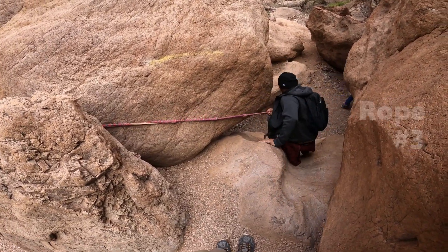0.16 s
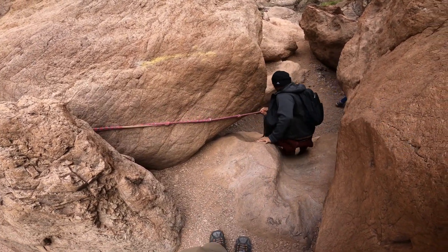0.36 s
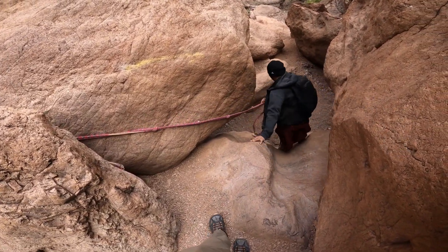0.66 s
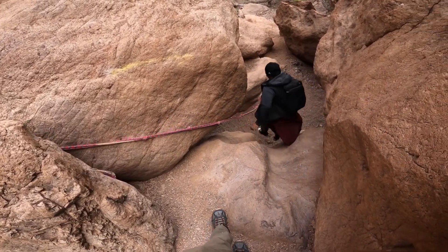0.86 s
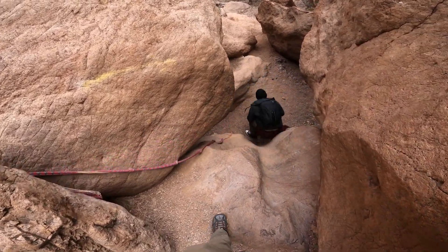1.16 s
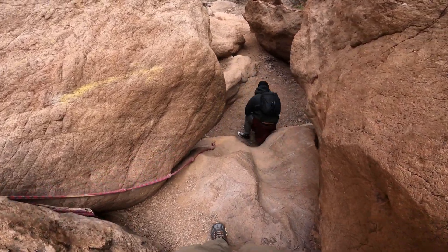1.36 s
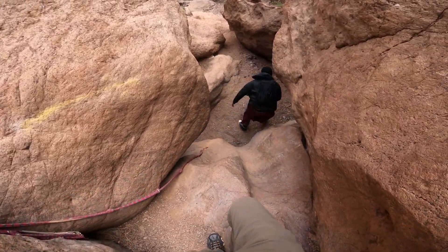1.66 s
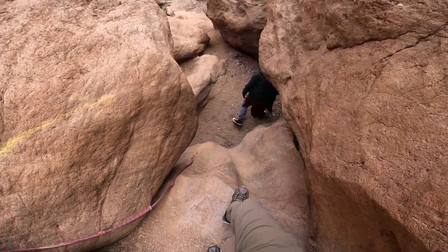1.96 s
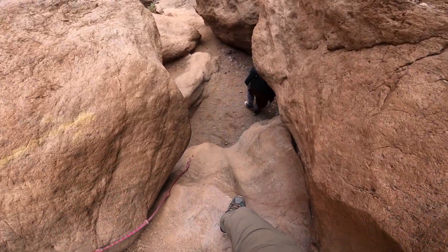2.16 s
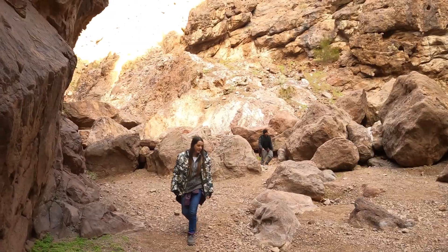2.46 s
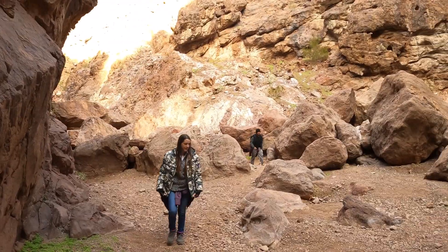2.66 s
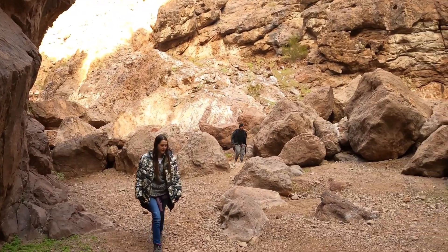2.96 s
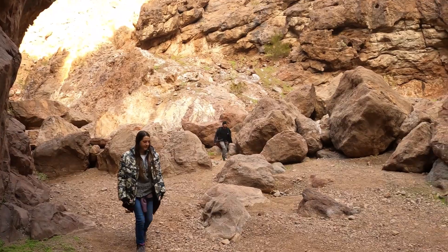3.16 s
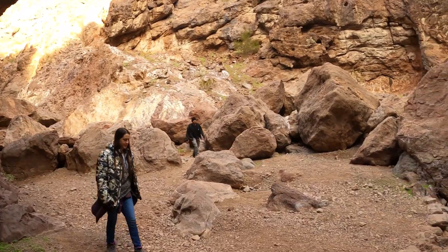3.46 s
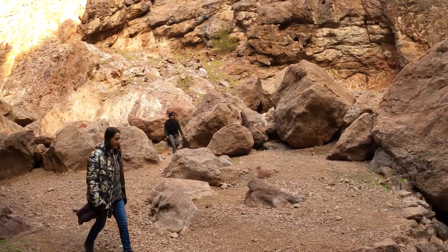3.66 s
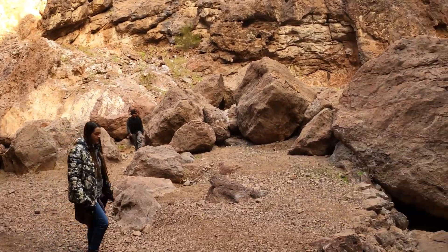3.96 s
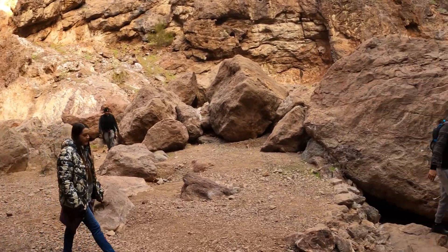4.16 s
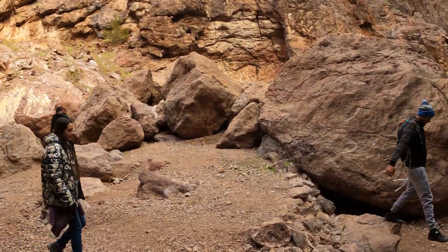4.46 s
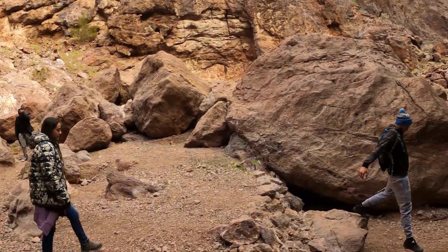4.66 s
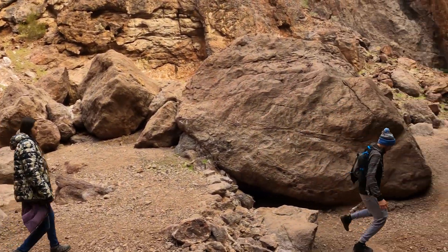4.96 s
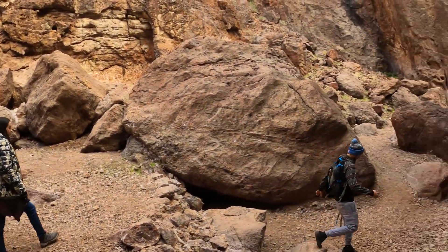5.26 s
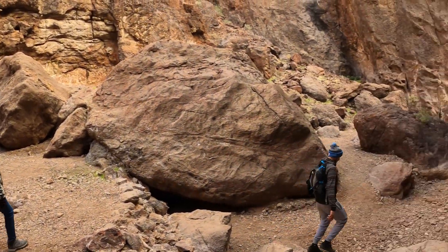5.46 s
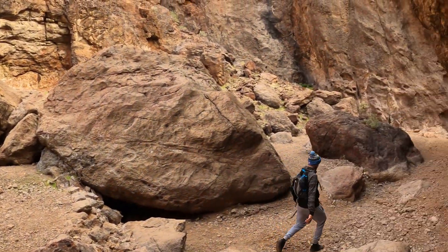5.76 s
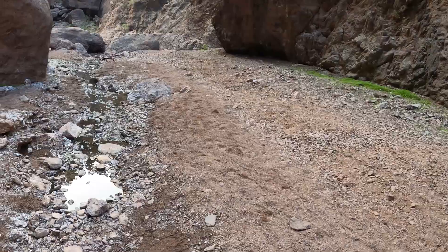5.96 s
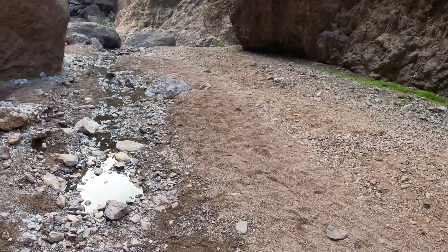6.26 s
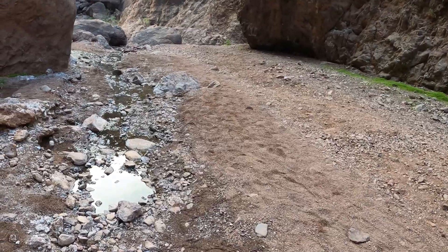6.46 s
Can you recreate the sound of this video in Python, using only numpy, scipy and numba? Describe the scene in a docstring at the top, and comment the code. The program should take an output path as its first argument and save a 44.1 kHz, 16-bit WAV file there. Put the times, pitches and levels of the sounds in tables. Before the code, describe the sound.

Hikers scuff through a rocky slot with jacket rustle and a heavy drop onto grit, then crunch across gravel and a sandy path.

```python
"""Footsteps of hikers in a dry canyon: each footfall thuds, shifts pebbles and crushes grit.
In a narrow slot a jacket rustles, zip pulls tinkle and someone drops off a rock ledge onto grit.
After a short silence walkers cross an open gravel wash, heel then sole, and go on along a sandy path.
The ground is made of countless tiny ticks and rings; single stones and hollow knocks are decaying tones.
The rock walls answer faintly, as fading noise, over a quiet hush of air."""
import sys
import numpy as np
from scipy import signal
from scipy.fft import rfft, irfft, next_fast_len
from scipy.io import wavfile
from scipy.ndimage import uniform_filter1d
from numba import njit

SR = 44100
rng = np.random.default_rng(int(sys.argv[2]) if len(sys.argv) > 2 else 0)


def materialize(psi):
    """Save the field psi as 16-bit PCM at rate SR to the path in sys.argv[1].

    A 1-D psi becomes a single channel; in a 2-D psi each row is a channel.
    """
    bounded = np.clip(np.atleast_2d(psi).T, -1, 1)
    quanta = np.round(bounded * 32767).astype(np.int16)
    wavfile.write(sys.argv[1], SR, quanta)


N = 291942
TIME = np.arange(N) / SR
SLOT_END_S, WASH_END_S = 2.4, 6.01

# All levels below are set before the gain of each place (PLACE_GAIN) and the final filters.
# Heel, sole and scuff contacts. Each row: time in seconds, rise in seconds, press in seconds,
# level in dB, weight on the foot in dB, grittiness in dB.
FOOTFALLS = [(0.23, 0.0016, 0.012, -45, 15, -10), (.43, .005, 0.024, -50.5, 8, 7),
             (0.783, 0.0063, 0.023, -54, -4, 15.5), (0.873, 0.0056, 0.0079, -49, -1, 7),
             (1.102, 0.009, 0.031, -28, 16.5, -4), (1.191, 0.0071, 0.057, -44, 22.5, 1.5),
             (1.268, 0.0066, 0.067, -36, 0, -40), (1.403, .003, 0.0048, -47.5, 20.5, 0),
             (1.447, .005, 0.048, -39.5, 2, -8), (1.64, 0.0069, 0.026, -42.5, 14.5, 0),
             (1.734, 0.002, 0.038, -37.5, 21, -11), (1.846, 0.0022, 0.024, -33.5, 10.5, -0.5),
             (2.095, .002, 0.0079, -39.5, 12.5, -36), (2.178, 0.015, 0.12, -44.5, 4, -18),
             (2.49, 0.0091, .025, -49.5, -8, -2), (2.563, 0.0081, 0.048, -52, 2.5, -10),
             (2.75, 0.0045, .048, -41, 2, -26), (3.008, 0.022, 0.08, -46.5, -2, 7),
             (3.097, 0.0027, 0.011, -37, -11, 8), (3.137, 0.0027, 0.042, -47, -8, 11.5),
             (3.264, .002, 0.0095, -42.5, 10.5, 4.5), (3.292, .005, 0.051, -61.5, 23.5, -9),
             (3.376, 0.0041, 0.028, -41, -8, -43), (3.567, 0.0014, 0.025, -40.5, -1, 12.5),
             (3.599, .004, 0.049, -48, -2, 19), (3.693, .003, 0.086, -45.5, -21, 7.5),
             (3.757, .004, 0.063, -43.5, -19, 8.5), (4.213, .003, 0.005, -43.5, 2.5, -6),
             (4.251, .002, 0.0027, -43, 7.5, 10.5), (4.289, 0.011, 0.031, -38.5, 4, -2.5),
             (4.368, 0.007, 0.023, -35.5, -6, 6), (4.71, 0.0035, .04, -47, 3, -10),
             (4.857, 0.0027, 0.025, -40, -1.5, 5), (4.889, .02, .058, -40.5, 5, 5.5),
             (4.989, 0.011, 0.054, -51.5, 13, -6), (5.238, 0.0061, 0.01, -46, -3, -28),
             (5.384, .025, 0.034, -39.5, 3.5, 11.5), (5.456, .002, 0.0088, -42, 1, -11),
             (5.504, 0.0056, 0.016, -52, 3, 9), (5.721, .006, 0.046, -46.5, 1, 6),
             (5.766, 0.0074, 0.045, -38.5, 3, 7.5), (6.028, 0.0052, 0.028, -46, 0.5, -9),
             (6.096, 0.0059, 0.11, -41, -12, 1)]
# Edges in Hz of the five bands of the ground: thud, bed, crunch, scrape and grit.
BAND_EDGES_HZ = [42, 130, 900, 2400, 5500, 16000]
# A plain footfall. One value for each of the five bands: level in dB.
FOOT_BANDS_DB = [-12, 2.5, 3, -1.5, -11.5]
# How much each band takes of a footfall's weight, its grittiness and the walker's direction.
# One value for each of the five bands: share, as a plain factor on the dB.
WEIGHT_SHARE = [1, 0.74, 0.14, 0.19, 0.22]
GRIT_SHARE = [0, 0.16, 0.019, 0.45, 1]
DIRECTION_SHARE = [0, 0.28, 0.82, 1, 0]
# How far left the nearest walker is. Each row: time in seconds, left minus right in dB.
DIRECTION = [(2.3, 3.5), (2.6, 4), (3.3, 3), (3.7, 4.5), (4.35, 6), (4.9, 3.5), (5.4, 4.5), (5.8, 6),
             (6.15, 4.5)]
# Stones keep settling after the press: level against the footfall, and time to fall by 60 dB.
SETTLE_DB, SETTLE_T60_S = -9, 0.38

# Colours of the ground in each place and of the jacket. Each row: frequency in Hz, level in dB.
SLOT_COLOUR = [(21, -31), (35, 8), (97, 2), (132, -9), (450, -11), (512, -5), (567, -13), (678, -8),
               (1390, -24.5), (2560, -29), (2910, -23.5), (5800, -40), (8500, -49.5), (13500, -59.5),
               (15700, -53.5)]
JACKET_COLOUR = [(35, -42.5), (60, 9.5), (98, -8), (179, 2.5), (455, -6.5), (661, -7.5), (895, -16.5),
                 (1270, -16), (1360, -15.5), (4160, -23.5), (8180, -42.5), (8770, -45), (15700, -51.5)]
WASH_COLOUR = [(15, -41), (25, 18), (75, -20.5), (156, 3.5), (254, 0), (333, 3.5), (472, -5), (1390, -7.5),
               (2320, -16), (3470, -7), (5950, -24), (7580, -22), (9160, -34.5), (13400, -41.5),
               (15700, -56)]
PATH_COLOUR = [(24, -45), (40, -21), (91, -48), (242, -2), (281, -5.5), (610, -7.5), (674, -11),
               (1060, -2.5), (1500, -5), (2530, -4), (7240, -16), (12200, -32), (15700, -42)]
PATCH_DB = 3  # how far the colour shifts from patch to patch

# Loose ground shifting between footfalls in each place. Each row: time in seconds, level in dB.
SLOT_SHUFFLE = [(0, -45.5), (.35, -55.5), (.48, -46), (.66, -67), (1.02, -54.5), (1.17, -37.5),
                (1.39, -41.5), (1.52, -41), (1.9, -51.5), (2.05, -49.5), (2.28, -49)]
WASH_SHUFFLE = [(2.5, -51.5), (2.7, -56), (3.1, -53), (3.5, -55), (3.68, -51), (3.91, -52.5), (4.03, -63.5),
                (4.12, -53.5), (4.2, -56.5), (4.35, -42.5), (4.52, -64.5), (4.65, -60), (4.78, -54),
                (5.13, -56), (5.3, -48.5), (5.56, -48.5), (5.66, -56.5), (5.9, -51.5)]
PATH_SHUFFLE = [(6.05, -45.5), (6.2, -54), (6.31, -61), (6.4, -48.5), (6.5, -50.5), (6.58, -47)]
# Colour of that shifting, with a row each for slot, wash and path.
# Each row: bed in dB, crunch in dB, scrape in dB, grit in dB.
SHUFFLE_BANDS_DB = [(1.5, 0.0089, -12, -20.5), (0.5, 0, -5, -9.5), (-8, 0, -1, -14)]
# Swish of the jacket in the slot. Each row: time in seconds, level in dB.
SWISH = [(0, -51), (.13, -53.5), (.3, -59), (.48, -51.5), (.68, -57), (.84, -52), (.92, -69), (1.0, -62.5),
         (1.08, -55), (1.7, -57), (2.1, -60)]
# Colour of the swish. One value each for crunch, scrape and grit: level in dB.
SWISH_BANDS_DB = [-5.5, 3, -4]
RUB_DB = -45  # steady low rub of cloth, in the bed band
SHUFFLE_LIFT_DB = 2  # raises loose ground and cloth together
UNEVEN_DB = 2  # how unevenly loose ground and cloth move
# Low rumble of the slot, swelling with the landing, sinking, then swelling again near 1.9 s.
# Each row: time in seconds, level in dB.
RUMBLE = [(0, -65), (.55, -60), (.66, -51.5), (1.09, -49), (1.16, -28), (1.4, -45.5), (1.65, -56),
          (1.92, -40), (2.3, -66.5), (2.5, -70)]

# Stray pebbles: how many, level over the crunch around them, its scatter, and their middle pitch.
STRAY_COUNT = 110
STRAY_DB, STRAY_SCATTER_DB, STRAY_HZ = 12.5, 2, 2285

# Hollow knocks of boots and packs and the boom of the landing.
# Each row: time in seconds, pitch in Hz, time to fall by 60 dB in seconds, peak in dB.
KNOCKS = [(0.649, 295, 0.037, -19.5), (1.104, 800, 0.021, -10), (1.11, 94, 0.26, -9.5),
          (1.119, 618, 0.054, -9), (1.135, 50, .46, -19), (1.194, 280, 0.092, -16),
          (1.74, 409, 0.11, -15.5), (1.85, 374, 0.23, -20), (2.222, 171, 0.15, -26),
          (2.907, 330, 0.04, -32), (3.099, 329, 0.11, -26.5), (3.265, 310, 0.053, -22.5),
          (4.9, 90, 0.12, -32), (5.406, 81, 0.11, -35), (5.776, 80.5, .15, -32)]
# Single pebbles snapping against each other. Each row: time in seconds, level in dB, pitch in Hz.
PEBBLES = [(0.232, -20.5, 1050), (.43, -24, 2100), (0.696, -23, 1020), (.943, -44.5, 1220),
           (.965, -27.5, 1420), (1.654, -23.5, 1980), (2.098, -23.5, 910), (2.576, -26.5, 1730),
           (2.792, -25, 1100), (2.863, -35, 2230), (2.907, -28.5, 1170), (3.024, -24, 4340),
           (3.294, -28, 3350), (3.381, -29, 1510), (3.526, -28, 1040), (3.642, -22, 2600),
           (3.663, -16.5, 4220), (3.693, -20.5, 2010), (3.791, -22, 1490), (3.893, -20, 3300),
           (4.013, -27, 3140), (4.095, -26.5, 1740), (4.147, -27, 2960), (4.249, -29, 3600),
           (4.372, -15.5, 1340), (4.391, -32, 2140), (4.618, -51, 3460), (4.795, -22.5, 3080),
           (4.854, -15.5, 1330), (5.174, -29.5, 1660), (5.417, -40, 2500), (5.457, -20, 1050),
           (5.508, -28, 2100), (5.898, -21.5, 2050), (6.366, -32, 1970)]
# Stones and small sharp chips clacking, each a quick double hit.
# Each row: time in seconds, level in dB, pitch in Hz,
# time for the ring to fall by 60 dB in seconds, left minus right in dB.
CLACKS = [(1.793, -9, 2490, 0.022, 10), (2.201, -7.5, 1290, 0.026, 9.5), (3.568, -23, 7960, .014, -19),
          (3.576, -18.5, 7500, 0.045, -15), (3.585, -18.5, 7600, 0.034, -9), (3.599, -12.5, 920, 0.0059, 3),
          (4.857, -15, 843, 0.019, -3), (6.19, -18.5, 1990, 0.011, 17.5)]
# Ring of a stone. Each row: multiple of the stone's pitch, level in dB.
STONE_MODES = [(1, 0), (1.3, -9), (1.62, -4), (1.8, -12), (2.55, -10)]
# Colour given to a stone's click. Each row: frequency in Hz, level in dB.
CLICK_COLOUR = [(500, 0), (2600, 0), (4500, -4), (7500, -1), (9500, -7), (15500, -15)]
# The contact in a clack softens the ring above this, or above its own lowest modes if they are higher.
CONTACT_HZ = 4800
# Zip pulls. Each row: time in seconds, pitch in Hz, level of the first of two tones in dB.
ZIPS = [(.005, 8250, -51), (.05, 8200, -53), (.103, 8300, -52), (.135, 8230, -47), (.152, 8300, -50),
        (.918, 5950, -53), (.975, 5820, -48), (.981, 7480, -44), (1.115, 13300, -43), (1.125, 5950, -36),
        (1.305, 5900, -47)]
ZIP_PAIR, ZIP_T60_S = 1.02, 0.09  # pitch ratio of the two tones, and time to fall by 60 dB

# Colour of the still air. Each row: frequency in Hz, level in dB.
AIR_COLOUR = [(18, -53), (30, -10.5), (103, -48.5), (156, -2.5), (231, -21), (264, -3.5), (412, -52.5),
              (495, -47.5), (1210, 7.5), (6440, 8.5), (15700, -64.5)]
AIR_DB = -64
# Loudness in each place, fading out in between. Each row: time in seconds, gain as a plain factor.
PLACE_GAIN = [(2.28, 0.4), (2.315, 0.0014), (2.465, 0), (2.5, 0.65), (5.975, 0.62), (6.003, 0.011),
              (6.015, 0.043), (6.04, 0.66)]
LOW_CUT_HZ, TOP_HZ = 31, 15500


def walking():
    """Footfalls press the ground of each place, and a quieter shuffle moves it in between."""
    in_slot, in_wash, on_path = (0, SLOT_END_S), (SLOT_END_S, WASH_END_S), (WASH_END_S, N / SR + .01)
    slot = gravel(in_slot, SLOT_COLOUR, rate=2600, spread_db=2.0, cycles=8.0, hiss=1.0, scatter=0)
    jacket = gravel(in_slot, JACKET_COLOUR, rate=2200, spread_db=1.0, cycles=2.7, hiss=1.0, scatter=0)
    wash = gravel(in_wash, WASH_COLOUR, rate=2300, spread_db=4.5, cycles=11, hiss=.55, scatter=3)
    sand = gravel(in_wash, WASH_COLOUR, rate=2300, spread_db=2.5, cycles=11, hiss=1.1, scatter=3)
    path = gravel(on_path, PATH_COLOUR, rate=3200, spread_db=4, cycles=9, hiss=.6, scatter=3)
    ground = np.concatenate([slot, wash, path], axis=2)[..., :N]
    loose = np.concatenate([jacket, sand, path], axis=2)[..., :N]

    steps = pressure(t60s=[0.22, 0.053, 0.073, 0.098, 0.14])
    shuffle = undb(SHUFFLE_LIFT_DB) * shuffling() * uneven()
    bands = steps[:, None] * ground
    bands[1:] += shuffle[:, None] * loose[1:]  # the shuffle has no thud band
    bands[0] += ground[0] * undb(curve(RUMBLE))

    lean_db = curve(DIRECTION) * np.array([[1], [-1]]) / 2
    placed = sum(sound * undb(share * lean_db) for sound, share in zip(bands, DIRECTION_SHARE))
    crunch = np.hypot(steps[2], shuffle[1])
    return placed + colour(strays(crunch), CLICK_COLOUR)


def pressure(t60s):
    """A foot loads the ground, holds and lets go, and stones settle; weight and grit tilt the bands."""
    power = np.zeros((len(t60s), N))
    t = np.arange(SR // 2) / SR
    for s, rise, press, db, weight_db, grit_db in FOOTFALLS:
        load = np.clip(t / max(rise, .001), 0, 1) ** 2
        released = np.maximum(t - rise / 2 - press, 0)
        fade = np.exp(-np.log(1000) * released / np.array(t60s)[:, None])
        settle = undb(SETTLE_DB) * np.exp(-np.log(1000) * released / SETTLE_T60_S)
        bands_db = db + np.array(FOOT_BANDS_DB)
        bands_db = bands_db + weight_db * np.array(WEIGHT_SHARE) + grit_db * np.array(GRIT_SHARE)
        drive = undb(bands_db)[:, None] * load * np.maximum(fade, settle)
        add(power, s - rise / 2, drive ** 2)  # overlapping contacts add as power
    return np.sqrt(power)


def gravel(span, points, rate, spread_db, cycles, hiss, scatter):
    """Countless tiny impacts, a few much stronger than the rest, split into five stereo bands."""
    n = int(span[1] * SR) - int(span[0] * SR)
    count = int(np.clip(rate * n / SR, 1, 20000))  # rate is impacts per second
    when, strength, sign, pitch, angle = rng.random((count, 5)).T
    size = undb(spread_db * np.minimum(-np.log(strength), 3.5)) * np.sign(sign - .5)
    hz = 400 + 14000 * pitch ** 2
    sand = hiss * rng.standard_normal(n)
    sides = []
    # pebbles lie at different angles, so each reaches the left up to `scatter` samples early or late
    for lag in (scatter * (2 * angle - 1), 0):
        start = np.clip(np.round(when * n + lag), 0, n - 1)
        # a contact is a broad tick plus the brief ring of that pebble, over a hiss of sliding sand
        grains = np.column_stack([start, hz, np.full(count, 1. * cycles), size * hz ** .75])
        rings = ring(grains, n)
        ticks = np.bincount(start.astype(int), size, n)
        sides.append(unit(rings) + 1.59 * unit(ticks) + sand)
    ground = colour(shifting(np.array(sides), PATCH_DB), points)
    edges = zip(BAND_EDGES_HZ, BAND_EDGES_HZ[1:])
    return np.array([even(band(ground, lo, hi), s=0.031) for lo, hi in edges])


@njit
def ring(grains, length):
    """Struck pebbles: a sum of damped sines, one for each row (start sample, Hz, cycles, size)."""
    out = np.zeros(length)
    for start, hz, cycles, size in grains:
        pole = np.exp((2j * np.pi - 6.9 / cycles) * hz / SR)  # turn and shrink in one sample
        z = size + 0j
        for i in range(int(start), min(length, int(start + cycles * SR / hz) + 2)):
            out[i] += z.imag
            z *= pole
    return out


def shifting(x, depth_db):
    """Other stones or folds come into play: colour patches some 20 ms long and 700 Hz wide."""
    spectra = signal.stft(x, nperseg=256)[2]
    patches = rng.standard_normal(spectra.shape[1:])
    patches = uniform_filter1d(patches, size=4, axis=0)  # across frequency
    patches = unit(uniform_filter1d(patches, size=7, axis=1))  # across time
    shifted = spectra * undb(depth_db * np.clip(patches, -2, 2))
    return signal.istft(shifted, nperseg=256)[1][:, :x.shape[-1]]


def even(x, s):
    """Hold the average strength steady over s seconds, so that the movement sets the loudness."""
    power = uniform_filter1d(np.mean(x ** 2, axis=0), size=int(s * SR))
    return x / np.sqrt(np.maximum(power, 1e-12))


def shuffling():
    """Loose ground shifts between footfalls; in the slot it joins the jacket's rub and swish."""
    place = np.searchsorted([SLOT_END_S, WASH_END_S], TIME)  # 0 slot, 1 wash, 2 path
    level_db = np.choose(place, [curve(SLOT_SHUFFLE), curve(WASH_SHUFFLE), curve(PATH_SHUFFLE)])
    ground = undb(level_db) * undb(SHUFFLE_BANDS_DB)[place].T
    rub = np.full(N, undb(RUB_DB))
    swish = undb(SWISH_BANDS_DB)[:, None] * undb(curve(SWISH))
    cloth = np.vstack([rub, swish])
    return np.hypot(ground, cloth * (place == 0))


def uneven():
    """Movement in fits and starts: random gains held for 25 ms and smoothed."""
    hold = SR // 40
    steps = np.repeat(rng.standard_normal(N // hold + 1), hold)
    return undb(UNEVEN_DB * uniform_filter1d(steps, size=hold)[:N])


def strays(crunch):
    """Odd pebbles tick at random, louder the harder the ground is being worked."""
    out = np.zeros((2, N))
    when = rng.random(STRAY_COUNT)
    for u, (size, pitch, side) in zip(when, rng.standard_normal((STRAY_COUNT, 3))):
        hz = STRAY_HZ * 2 ** np.clip(pitch / 2, -1, 1)  # within an octave either way
        tick = stone(hz, t60=.012, crack=1, crack_s=.003)
        level = crunch[int(u * N)] * undb(STRAY_DB + STRAY_SCATTER_DB * size)
        add(out, u * N / SR, tick * level * pan(2 + 2 * side))
    return out


def knocks():
    """A sole meeting firm ground rings one damped low mode, roughened by the rolling contact."""
    out = np.zeros((2, N))
    t = np.arange(SR // 2) / SR
    for s, hz, t60, db in KNOCKS:
        wobble = unit(band(rng.standard_normal(len(t)), hz / 20, hz / 4, order=1))
        fade = np.minimum(t * hz, 1) * undb(db - 60 * t / t60)  # rises over one cycle
        add(out, s, fade * np.sin(2 * np.pi * hz * t + .5 * wobble))
    return out


def stones():
    """Pebbles snap underfoot; stones and small sharp chips clack, each with a quick double hit."""
    out = np.zeros((2, N))
    for s, db, hz in PEBBLES:
        snap = stone(hz, t60=.012, crack=2, crack_s=.004)
        side_db = np.interp(s, *np.transpose(DIRECTION))
        add(out, s, snap * undb(db) * pan(side_db))
    for s, db, hz, t60, side_db in CLACKS:
        for delay, change_db in ((0, -4), (.0016, 1)):  # the second hit is stronger
            hit = stone(hz, t60, crack=2.6, crack_s=.0025)
            hit = band(hit, hz / 4, max(CONTACT_HZ, 1.5 * hz), order=1)
            add(out, s + delay, hit * undb(db + change_db) * pan(side_db))
    return colour(out, CLICK_COLOUR)


def stone(hz, t60, crack, crack_s):
    """One stone struck: a short crack of noise and a few fast-dying modes, peak 1."""
    t = np.arange(SR // 16) / SR
    sound = crack * rng.standard_normal(len(t)) * np.exp(-t / crack_s)
    sound = band(sound, hz / 2, min(hz * 1.53, TOP_HZ), order=1)
    for multiple, db in STONE_MODES:
        f = hz * multiple * (1 + .02 * rng.standard_normal())  # no two stones quite alike
        if f < TOP_HZ:
            sound = sound + undb(db - 60 * t / t60) * np.sin(2 * np.pi * f * t)
    return sound / np.abs(sound).max()


def zips():
    """Small metal tabs brush together and ring with a close pair of modes."""
    out = np.zeros((2, N))
    t = np.arange(SR // 5) / SR
    for s, hz, db in ZIPS:
        tone = np.sin(2 * np.pi * hz * t) + .5 * np.sin(2 * np.pi * hz * ZIP_PAIR * t)
        onset = np.minimum(t / .004, 1)
        add(out, s, tone * onset * undb(db - 60 * t / ZIP_T60_S))
    return out


def walls(x, t60, damp_hz):
    """Scattered reflections off rough rock, different on each side and duller than the direct sound."""
    t = np.arange(SR // 2) / SR
    echo = rng.standard_normal((2, len(t))) * np.exp(-np.log(1000) * t / t60) * (t > .004)
    echo = band(echo, 180, min(damp_hz, TOP_HZ), order=1)
    echo = echo / np.sqrt(np.sum(echo ** 2) / 2)
    return signal.fftconvolve(x.mean(0)[None], echo, axes=1)[:, :N]


def air():
    """Faint, even hush of the canyon: coloured noise, separate on each side."""
    return undb(AIR_DB) * unit(colour(rng.standard_normal((2, N)), AIR_COLOUR))


def undb(db):
    """Decibels to gain."""
    return 10 ** (np.asarray(db) / 20)


def unit(x):
    """Scale to an rms (average strength) of 1."""
    return x / np.sqrt(np.mean(x ** 2))


def curve(rows):
    """The second column of a table, joined by straight lines in time."""
    rows = np.array(rows)
    return np.interp(TIME, rows[:, 0], rows[:, 1])


def colour(x, points):
    """Filter a sound by a curve of (Hz, dB) points."""
    hz, db = np.transpose(points)
    length = x.shape[-1]
    size = next_fast_len(length + 1024)
    freq = np.maximum(np.fft.rfftfreq(size, 1 / SR), 1)
    gain = undb(np.interp(np.log(freq), np.log(hz), db))
    return irfft(rfft(x, size) * gain, size)[..., :length]


def band(x, lo, hi, order=4):
    """Keep the frequencies between lo and hi, in Hz."""
    return signal.sosfilt(signal.butter(order, [lo, hi], "band", fs=SR, output="sos"), x)


def pan(db):
    """Left and right gains for a level difference."""
    return undb(np.array([[db], [-db]]) / 2)


def add(out, s, sound):
    """Mix a short sound in at time s."""
    i = max(int(s * SR), 0)
    out[:, i:i + sound.shape[-1]] += sound[..., :N - i]


def scene():
    """The slot is heard in the centre; in the open the sound reaches the right side a moment earlier."""
    direct = walking() + knocks() + stones() + zips()
    echoes = undb(-13) * walls(direct, t60=0.17, damp_hz=7100)
    hush = air()
    slot = direct.mean(0) + echoes[0] + hush[0]
    late_left = np.roll(direct[0], 3)  # by three samples
    wide = np.array([late_left, direct[1]]) + echoes + hush
    return np.where(TIME < SLOT_END_S, slot, wide)


def record(dry):
    """The gain of each place with fades in between, the microphone's low cut and a steep top cut."""
    faded = dry * np.clip(curve(PLACE_GAIN), 0, 1)
    low_cut = signal.butter(4, LOW_CUT_HZ, "high", fs=SR, output="sos")
    top_cut = signal.ellip(8, .2, 70, TOP_HZ, fs=SR, output="sos")
    return signal.sosfilt(top_cut, signal.sosfilt(low_cut, faded))


dry = scene()
out = record(dry)
materialize(out)
```